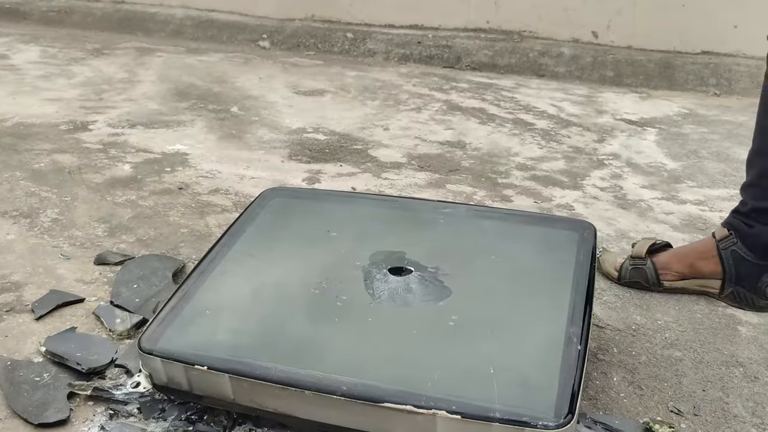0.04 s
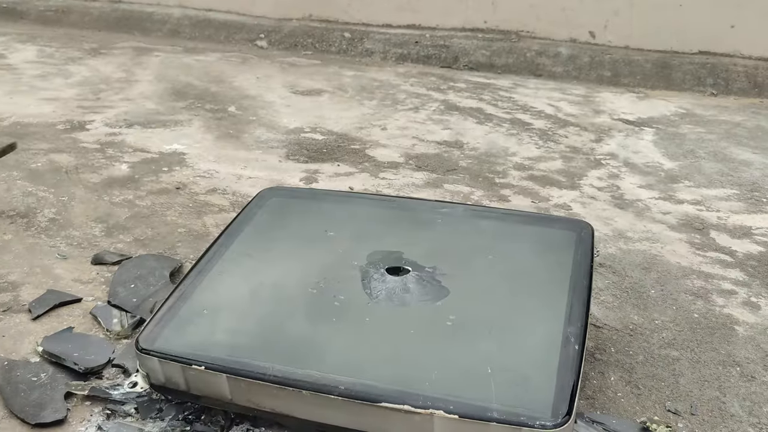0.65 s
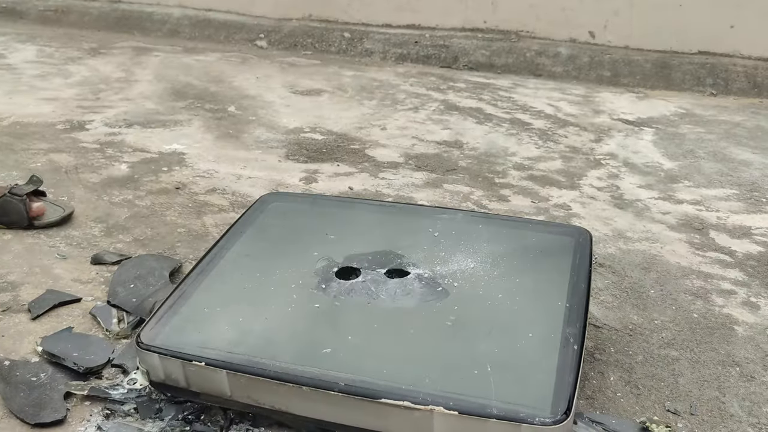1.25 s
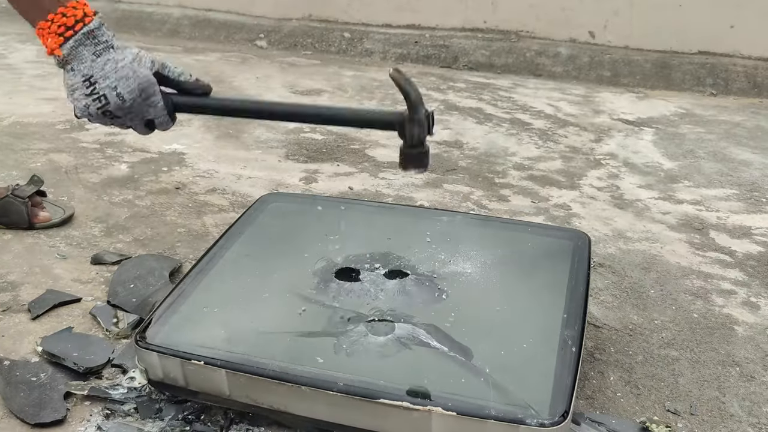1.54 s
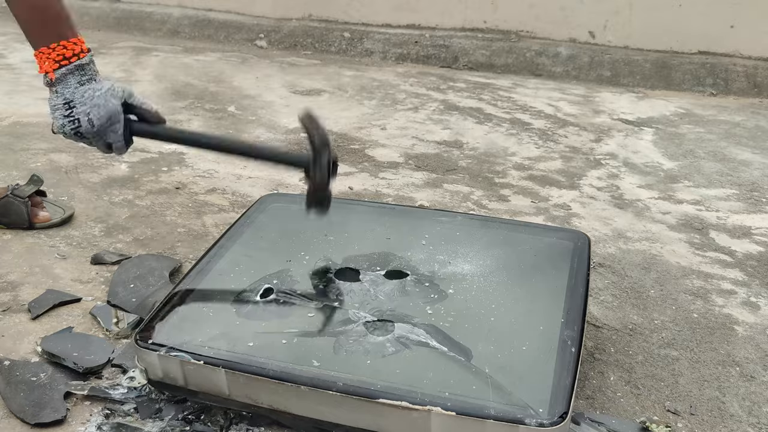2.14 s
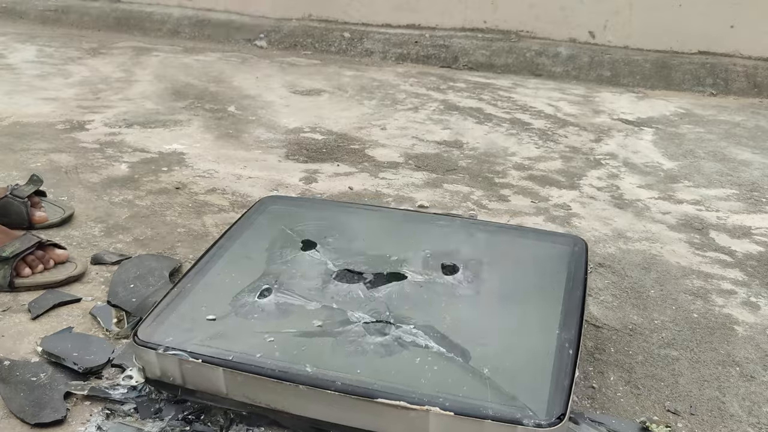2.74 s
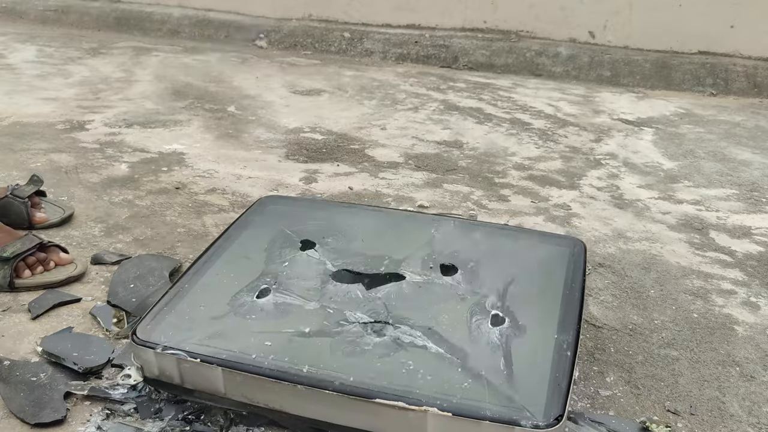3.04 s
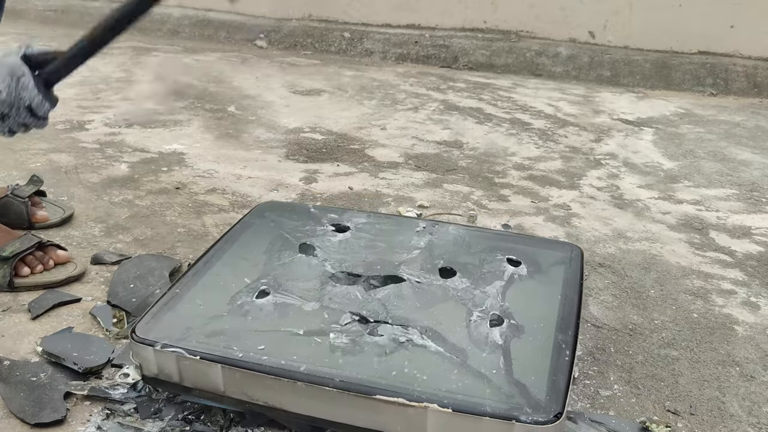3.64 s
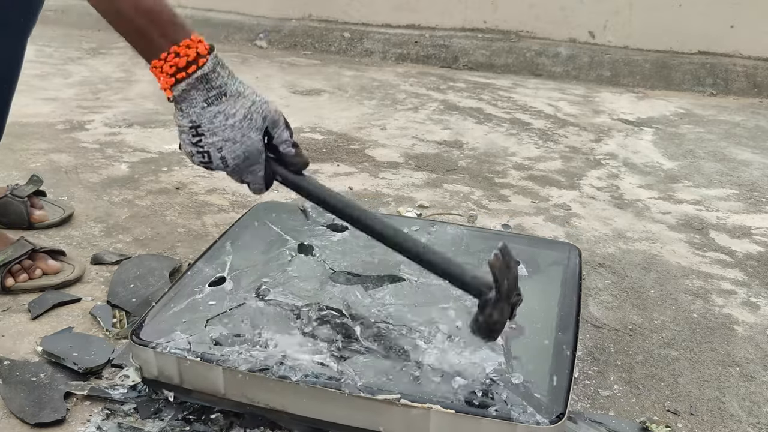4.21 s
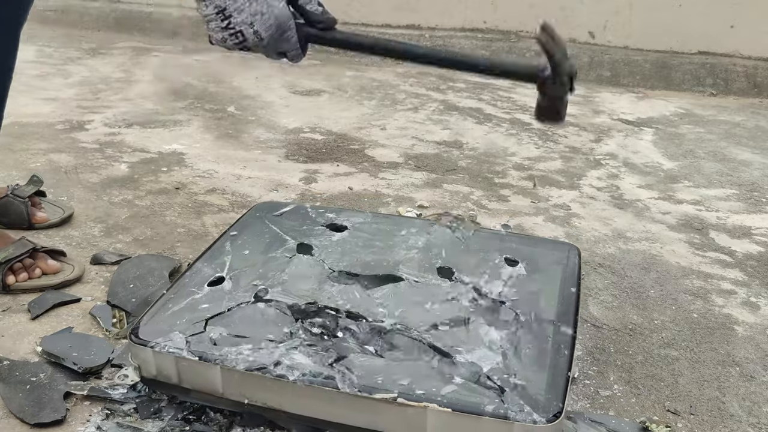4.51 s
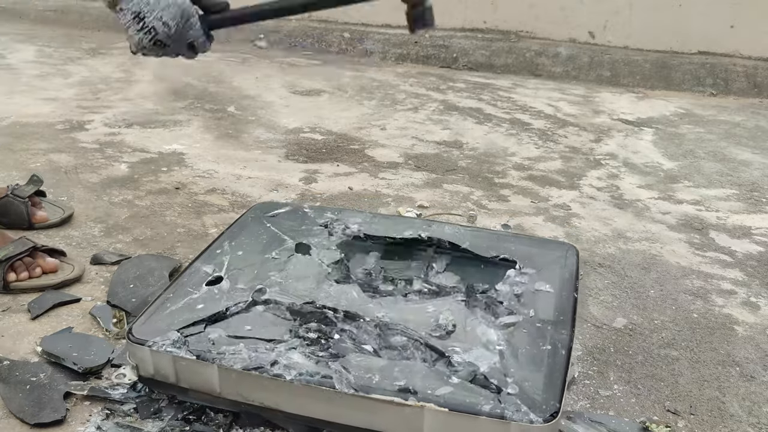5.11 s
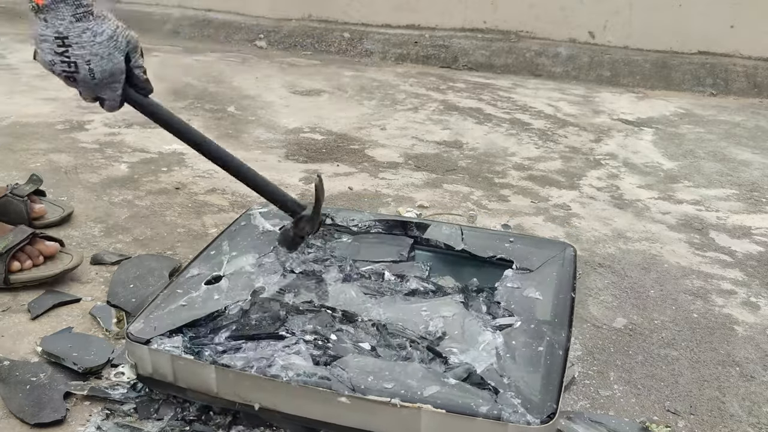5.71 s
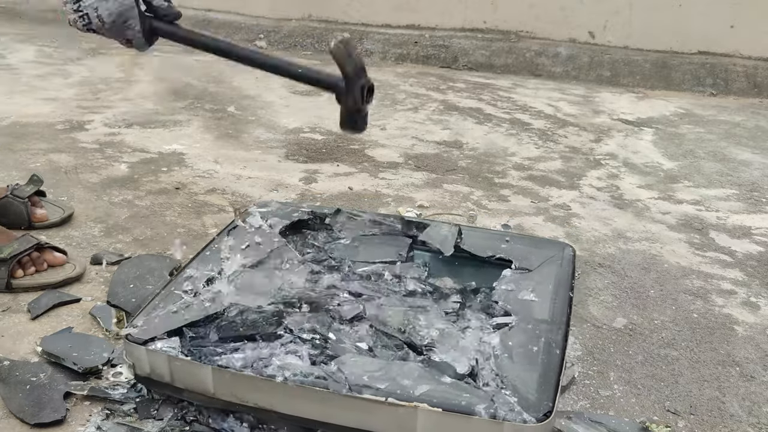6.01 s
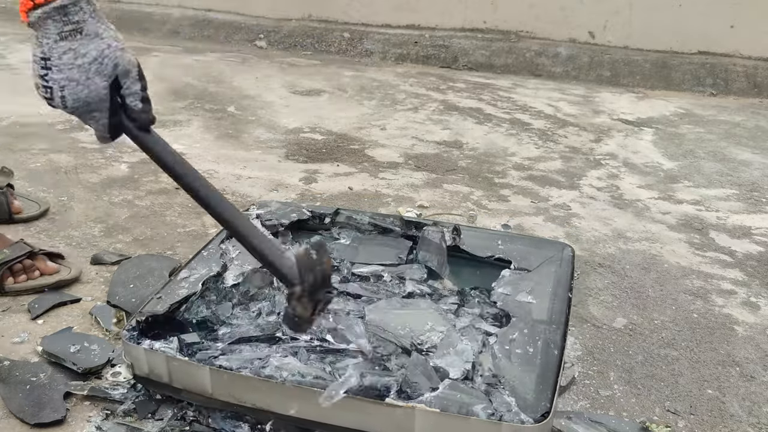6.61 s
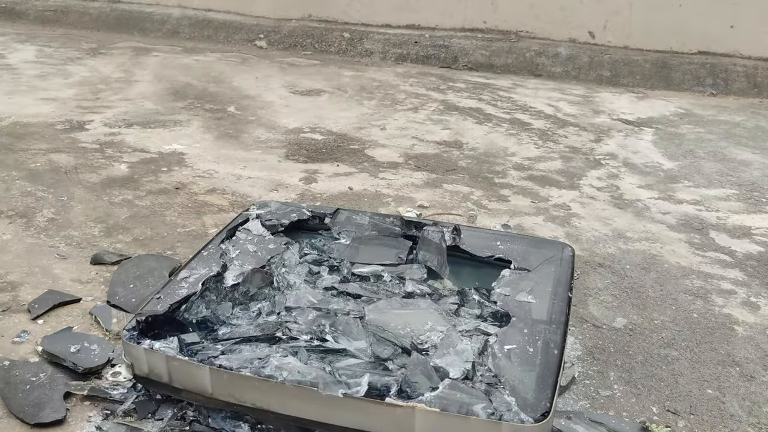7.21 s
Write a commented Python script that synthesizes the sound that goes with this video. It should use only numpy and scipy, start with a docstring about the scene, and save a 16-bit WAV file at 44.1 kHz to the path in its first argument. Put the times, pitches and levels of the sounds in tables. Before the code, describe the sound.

Sandals scuff softly on gritty concrete, then a claw hammer strikes the thick glass of a picture tube about twenty times. Each loud blow cracks, rings briefly and scatters splinters, overloading the close microphone and echoing off yard walls. The hits speed up, loose pieces clink, and the glass caves in with a crunch before one last blow. Faint traffic, small birds and a distant engine lie behind.

```python
"""Far traffic rumbles around a walled yard, sandals scuff on grit and small birds start to call.
From 0.8 s a claw hammer hits the thick glass face of a picture tube lying on concrete, twenty times.
Each blow cracks the glass, rings the face and the steel head, throws splinters and echoes off the walls;
the blows overload the close microphone. From 2.4 s loose pieces drop and clink as the face breaks up.
A distant engine draws near, the face caves in at about 6.2 s, and one last blow follows."""
import sys
import numpy as np
from scipy import signal
from scipy.io import wavfile

SR = 44100
rng = np.random.default_rng(int(sys.argv[2]) if len(sys.argv) > 2 else 0)


def digitize_waveform(pressure):
    """Quantize a signal to 16-bit integers and store it at the path in sys.argv[1].

    Rows of a 2-D input are taken as channels; values are limited to [-1, 1].
    """
    field = np.atleast_2d(pressure).T
    bounded = np.clip(field, -1, 1)
    quanta = np.round(bounded * 32767).astype(np.int16)
    wavfile.write(sys.argv[1], SR, quanta)


N = 328897
TIME = np.arange(N) / SR
EDGES = np.geomspace(22, 17500, 25)   # borders of 24 frequency bands [Hz]
CENTRES = np.sqrt(EDGES[1:] * EDGES[:-1])
BANK = [signal.butter(2, edge, "band", fs=SR, output="sos") for edge in zip(EDGES, EDGES[1:])]


def amp(db):
    """Turn decibels into a gain."""
    return 10 ** (np.asarray(db) / 20)


def dying(t, fade_s):
    """A fade that falls by 60 dB in the fade time."""
    return np.exp(-np.log(1000) * t / fade_s)


def unit(x):
    """Scale a sound to a total energy of 1."""
    return x / np.sqrt(np.sum(x ** 2, axis=-1, keepdims=True) + 1e-20)


def per_band(points):
    """Read a (frequency, value) table at the middle of each band."""
    hz, value = np.transpose(points)
    return np.interp(np.log(CENTRES), np.log(hz), value)[:, None, None]


def panned(db):
    """Left and right gains, with the left louder by db."""
    return amp([[db / 2], [-db / 2]])


def add(out, s, sound):
    """Mix a short sound in at s seconds."""
    i = max(int(s * SR), 0)
    out[:, i:i + sound.shape[-1]] += sound[..., :max(N - i, 0)]


def noise_bands(size, likeness):
    """Noise shaped (bands, 2, size). Left-right likeness: 1 is the same, 0 unrelated, -1 opposite."""
    white = rng.standard_normal((2, 2, size + 2000))
    bands = unit(np.array([signal.sosfilt(sos, white[k % 2])[:, -size:] for k, sos in enumerate(BANK)]))
    alike = np.clip(per_band(likeness), -.99, .99)
    shared = np.sqrt(1 + alike) * bands[:, :1]
    opposed = np.sqrt(1 - alike) * bands[:, 1:] * [[1], [-1]]
    return (shared + opposed) / np.sqrt(2)


def flicker(t, per_s, depth_db):
    """A gain that moves to a new random value per_s times a second."""
    steps = rng.standard_normal(len(t))
    return amp(depth_db * np.interp(t * per_s, np.arange(len(t)), steps))


def ringing(t, tones, scatter_db):
    """A struck thing's fading tones (pitch, level, fade time); high ones reach the sides out of step."""
    hz, db, fade_s = np.transpose(tones)[:, :, None, None]
    phase = rng.uniform(0, 2 * np.pi, hz.shape)
    phase = phase + rng.normal(0, 1, (len(hz), 2, 1)) * np.minimum(hz / 3500, 1)
    strength = amp(db + scatter_db * rng.normal(0, 1, hz.shape))
    return np.sum(strength * dying(t, fade_s) * np.sin(2 * np.pi * hz * t + phase), axis=0)


# how far traffic and breeze swell: (time [s], relative rumble [dB], relative road noise [dB])
TRAFFIC_SWELL = [(0.0, -45, -49.5), (0.89, -47.5, -50), (1.16, -52, -57), (3.88, -49, -55),
                 (4.9, -47.5, -49), (6.09, -44, -45), (7.1, -52, -52), (7.46, -51, -46)]
# their tone colour: (frequency [Hz], level [dB per Hz])
TRAFFIC_COLOUR = [(25, -9.5), (40, -3), (58, 4.5), (85, -6), (120, -4.5), (170, -6), (240, -14.5),
                  (325, -11), (410, -19.5), (600, -14), (1000, -25), (2000, -30.5), (6000, -41),
                  (15000, -55)]
# how alike they are left and right: (frequency [Hz], likeness)
TRAFFIC_LIKENESS = [(50, 1), (200, 1), (700, 0.46), (2000, 0), (10000, 1)]
def traffic():
    """Low rumble and road noise swell slowly; a faint hiss follows the road."""
    times, rumble_db, road_db = np.transpose(TRAFFIC_SWELL)
    hiss_db = -63 + .51 * (road_db - road_db.mean())
    bands = noise_bands(N, TRAFFIC_LIKENESS) * amp(per_band(TRAFFIC_COLOUR))
    bands *= np.sqrt(CENTRES)[:, None, None]   # higher bands are wider
    part = np.digitize(CENTRES, [230, 1200])   # split into rumble, road and hiss [Hz]
    out = np.zeros((2, N))
    for k, (db, left_db) in enumerate([(rumble_db + 1.5, 5), (road_db - 2, 3.5), (hiss_db, .5)]):
        noise = np.sqrt(N) * unit(bands[part == k].sum(axis=0))
        out += noise * panned(left_db) * amp(np.interp(TIME, times, db))
    return out


# the engine's hum: (pitch [Hz], relative level [dB])
ENGINE_TONES = [(322, 0.5), (565, -6)]
# how it grows louder: (time [s], level [dB])
ENGINE_APPROACH = [(0, -69), (3.8, -63), (4.6, -56), (6.7, -52.5), (7.46, -51.5)]
def engine(blur_hz=22):
    """A far engine draws near, its hum blurred by distance into narrow bands of noise."""
    drone = np.zeros(N)
    for hz, db in ENGINE_TONES:
        band = signal.butter(2, [hz - blur_hz, hz + blur_hz], "band", fs=SR, output="sos")
        drone += amp(db) * unit(signal.sosfilt(band, rng.standard_normal(N)))
    return np.sqrt(N) * drone * amp(np.interp(TIME, *np.transpose(ENGINE_APPROACH))) * panned(3.5)


# how alike nearby sounds are left and right: (frequency [Hz], likeness)
NEAR_LIKENESS = [(300, 0.83), (700, 0.93), (1400, 0.31), (2800, 0.4), (5600, 0.15), (11000, 0)]
# sandal scuffs: (time [s], level [dB], rough half length [s])
SCUFFS = [(0.071, -54, 0.011), (0.12, -46.5, 0.015), (0.292, -52, 0.017), (0.397, -46, 0.0055),
          (0.416, -50, 0.023), (0.662, -48.5, 0.027), (0.73, -55.5, 0.015), (1.069, -42, 0.012)]
# their tone colour: (frequency [Hz], band level [dB])
SCUFF_COLOUR = [(200, -28.5), (900, -15), (2000, -9), (3800, 1.5), (7000, -2.5), (11000, -4.5), (15000, -7)]
def sandals():
    """Soles drag over gritty concrete in short, scratchy swells."""
    swells = sum(amp(db) * np.exp(-.5 * ((TIME - s) / width) ** 2) for s, db, width in SCUFFS)
    size = 2 * SR
    rub = np.sum(amp(per_band(SCUFF_COLOUR)) * noise_bands(size, NEAR_LIKENESS), axis=0)
    grit = unit(rub * flicker(TIME[:size], per_s=600, depth_db=4.5)) * np.sqrt(size)
    return swells * np.pad(grit, ((0, 0), (0, N - size)))


# one bird whistles: (time [s], length [s], start pitch [Hz], end pitch [Hz], relative level [dB])
CHIRPS = [(.575, .11, 2950, 2650, -62), (0.667, 0.17, 2300, 3460, -54), (0.713, 0.065, 2400, 1740, -57),
          (1.66, .17, 2720, 3020, -66), (1.75, .1, 1250, 1347, -61), (6.99, 0.1, 960, 840, -59)]
# a tiny bird repeats one thin note: (time [s])
PEEP_TIMES = [1.206, 1.41, 2.07, 2.505, 2.765, 3.05, 7.2]
def birds():
    """Thin sliding whistles from far off flutter on their way across the yard."""
    out = np.zeros((2, N))
    peeps = [(s, .09, 7280, 7000, -62) for s in PEEP_TIMES]   # same columns as CHIRPS
    for s, length, start_hz, end_hz, db in list(CHIRPS) + peeps:
        t = TIME[:int(length * SR)]
        hz = np.linspace(start_hz, end_hz, len(t)) * flicker(t, per_s=250, depth_db=.05)
        flutter = np.array([flicker(t, per_s=120, depth_db=3.5) for side in range(2)])
        whistle = np.hanning(len(t)) * np.sin(2 * np.pi * np.cumsum(hz) / SR)
        add(out, s, amp(db - 1.5) * flutter * whistle)
    return out


# how fast crushed glass falls quiet: (frequency [Hz], fade time [s])
CRUNCH_FADE = [(150, 0.086), (600, .15), (2000, 0.15), (6000, 0.11), (14000, 0.081)]
def breaking_glass(t, colour_db, crunch_db, crack_s=.004, collapse_s=.0049):
    """Cracks run for a few milliseconds, then the crushed glass crunches."""
    noise = noise_bands(len(t), NEAR_LIKENESS)
    crack = unit(noise * np.exp(-(t / crack_s) ** 3))
    rise = 1 - np.exp(-(t / collapse_s) ** 2)
    crunch = unit(noise * rise * dying(t, per_band(CRUNCH_FADE)) * flicker(t, per_s=710, depth_db=-2))
    return np.sum(amp(colour_db) * unit(crack + amp(crunch_db) * crunch), axis=0)


# hammer blows, with relative levels: (time [s], strength [dB], thud of the casing [dB],
# crunch against crack [dB], struck piece's first pitch [Hz], its second pitch [Hz], its ring [dB],
# steel ring [dB], splinters [dB], air push [dB])
BLOWS = [(0.8021, 9, 3.5, 2.5, 470, 2090, -8, -13, -11.5, -3),
         (1.4576, 4.5, 3.5, -3, 1190, 2027, -10.5, -10, -11.5, -12),
         (1.85, 5, -2, -2.5, 585, 1970, -11.5, -17.5, -11, -22.5),
         (2.1826, 4.5, -2.5, -2.5, 640, 1640, -11, -13, -28.5, -8.5),
         (2.5615, 7, -6, -4, 1390, 2910, -11.5, -18.5, -13.5, -8),
         (2.8984, 7.5, -7.5, -4.5, 956, 2070, -8.5, -16.5, -34, -2),
         (3.2138, 6.5, -11.5, -2.5, 684, 6450, -9, -16, -9, -12),
         (3.4546, 8, -3, -5.5, 1190, 1550, -4.5, -10, -19.5, -12.5),
         (3.6919, 4.5, 7.5, -2, 1150, 1910, -9, -22, -37, -3),
         (3.9288, 3.5, 2, -4, 703, 3800, -19, -11, -5.5, -17.5),
         (4.1814, 5, 0.5, 0, 1050, 3080, -20, -19.5, -11.5, 3.5),
         (4.4146, 3.5, -2.5, 0, 1910, 3270, -7, -25.5, -11, -16.5),
         (4.6727, 5, -11.5, 4, 863, 4540, -13.5, -26.5, -2, -21),
         (4.9281, 2, -23, 1, 917, 6100, -14, -28.5, -2, -16.5),
         (5.1776, 5.5, 0, -1.5, 700, 1360, -14.5, -12.5, -5.5, -10.5),
         (5.4188, 3.5, 0, 0.5, 1100, 3620, -15, -14.5, -7, -26),
         (5.6655, 4, 7.5, -3, 1023, 640, -17, -20.5, -11.5, -29),
         (5.9239, 5.5, 10, 1.5, 1033, 1410, -13.5, -24, -3, -6.5),
         (6.1794, 9.5, -1, 12, 1150, 9350, -32, -13, -0.5, -12.5),
         (6.5387, 6.5, 11.5, 3, 6260, 4480, -9, -6, -7.5, -9)]
# tone colour of cracking glass: (frequency [Hz], band level [dB])
CRACK_COLOUR = [(90, -17), (180, -19.5), (330, -14.5), (450, -11), (620, -4.5), (900, -6), (1300, -1),
                (2200, 0), (4000, 0.5), (7000, 0), (11000, 0), (15000, -1)]
# the glass gives way, is firm again at the far rim, then caves in: (time [s], firmness [dB])
FIRMNESS = [(.8, 3), (2.2, 10), (2.55, -2), (3.9, 2.5), (4.67, -4), (5.18, 4.5), (5.7, 3), (6.18, -13.5),
            (6.54, -8)]
# firm glass sounds full, loose glass thin: (frequency [Hz], boost [dB per dB of firmness])
FIRM_COLOUR = [(270, 0.37), (650, 0.97), (1600, 0.51), (4200, 0.32), (10500, 0.1)]
# the casing thuds only in the low notes: (frequency [Hz], share of the thud [0 to 1])
THUD_RANGE = [(270, 1), (650, 0)]
# tones of the glass face: (pitch [Hz], relative level [dB], fade time [s])
FACE_TONES = [(454, -17.5, 0.27), (526, -7, 0.26), (575, 4.5, 0.1), (661, -1.5, 0.16), (860, -9.5, 0.034),
              (1001, -3.5, 0.2), (1127, 7, 0.088), (1224, -7.5, 0.29), (1546, -5, 0.12), (1750, -4, 0.035),
              (2044, -3.5, 0.085)]
def hammer_blows():
    """Each blow breaks glass and rings the whole face; the firmer the glass is held, the fuller."""
    out, t = np.zeros((2, N)), TIME[:SR // 4]
    for s, db, thud_db, crunch_db, *_ in BLOWS:
        firm_db = np.interp(s, *np.transpose(FIRMNESS))
        colour_db = db + per_band(CRACK_COLOUR) + firm_db * per_band(FIRM_COLOUR)
        colour_db += thud_db * per_band(THUD_RANGE)
        add(out, s - .0003, breaking_glass(t[:SR // 6], colour_db, crunch_db) * panned(2))
        add(out, s, amp(db + firm_db - 36) * ringing(t, FACE_TONES, scatter_db=2.5))
    return out


def struck_pieces(first_fade_cycles=41.3, second_fade_s=.012):
    """The piece of glass under the hammer knocks at two pitches that die quickly."""
    out, t = np.zeros((2, N)), TIME[:SR // 8]
    for s, _, _, _, first_hz, second_hz, db, *_ in BLOWS:
        tones = [(first_hz, db, first_fade_cycles / first_hz), (second_hz, db + 3.5, second_fade_s)]
        add(out, s, ringing(t, tones, scatter_db=3))
    return out


# tones of the steel head: (pitch [Hz], relative level [dB], fade time [s])
STEEL_TONES = [(9320, -24, .22), (10430, -18.5, .42), (15635, -22, .22)]
def steel_head():
    """The head sings on as it swings away, wavering in level and pitch with the motion."""
    out, t = np.zeros((2, N)), TIME[:SR // 2]
    for s, *_, steel_db, _, _ in BLOWS:
        swing = np.array([flicker(t, per_s=100, depth_db=6) for side in range(2)])
        wavering_time = np.cumsum(flicker(t, per_s=40, depth_db=.012)) / SR
        add(out, s, amp(steel_db) * swing * ringing(wavering_time, STEEL_TONES, scatter_db=1.2))
    return out


def air_push(rise_s=.0059, fall_s=.019, recover_hz=4.3):
    """The jolt of a blow shoves the microphone membranes, mostly the left, and they creep back."""
    out, t = np.zeros((2, N)), TIME[:SR // 6]
    leak = signal.butter(1, recover_hz, "high", fs=SR, output="sos")
    for s, *_, push_db in BLOWS:
        shove = (1 - np.exp(-t * amp(push_db) / rise_s)) * np.exp(-t / fall_s)   # harder is steeper
        shove = signal.sosfilt(np.vstack([leak, leak]), shove) * (1 - (t / t[-1]) ** 2)
        sides = np.array([[1], [rng.uniform(.05, .7)]]) * rng.choice([-1, 1])
        add(out, s, amp(push_db) * sides * shove / shove.max())
    return out


# tone colour of falling glass: (frequency [Hz], band level [dB])
SHARD_COLOUR = [(150, -40.5), (500, -10.5), (1000, -1.5), (2500, -0.5), (6000, 2.5), (10000, 2),
                (15000, -1)]
def splinters(chips_per_blow=75):
    """Chips thrown by each blow land soon after it: glassy ticks over a rustle of fine crumbs."""
    out, t, after = np.zeros((2, N)), TIME[:SR // 50], TIME[:SR // 3]
    for s, *_, splinter_db, _ in BLOWS:
        flights_s = rng.gamma(2, .048, chips_per_blow)
        sizes = rng.normal(0, 1, chips_per_blow)
        sides_db = rng.normal(0, 2.6, chips_per_blow)
        for flight_s, size, left_db in zip(flights_s, sizes, sides_db):
            ring = ringing(t, [(hz, 0, .02) for hz in rng.uniform(1200, 15500, 5)], scatter_db=2.5)
            click = amp(6.5) * rng.standard_normal((2, len(t))) * dying(t, .005)
            db = splinter_db - 37 + 5.6 * min(size, 1.6) - 37 * flight_s   # late chips land softer
            add(out, s + flight_s, amp(db) * panned(left_db) * (ring + click))
        grit = flicker(after, per_s=450, depth_db=5)
        rustle = np.sum(amp(per_band(SHARD_COLOUR)) * noise_bands(len(after), NEAR_LIKENESS), axis=0)
        swell = (1 - np.exp(-after / .046)) * dying(after, .58)
        add(out, s, amp(splinter_db + 16.5) * unit(rustle * grit) * swell)
    return out


# loose pieces that drop or shift: (time [s], relative level [dB], brightness [dB per octave])
SHARDS = [(2.408, -40, -1.5), (3.356, -30.5, 3.5), (3.643, -34, 1.5), (4.037, -25, -8), (4.069, -28, -1.5),
          (4.342, -31.5, 0.5), (4.597, -23, -0.5), (4.814, -21.5, -0.5), (4.851, -28, 1), (5.124, -24, -1),
          (5.374, -24, 0.5), (5.539, -22.5, 0.5), (5.838, -33, 8), (5.977, -14, 4.5), (6.123, -26, 4),
          (6.32, -16.5, 1), (6.342, -26, -1.5), (6.832, -35.5, 7)]
def shards():
    """Larger pieces clack against the wreck, clink and rattle briefly."""
    out, t = np.zeros((2, N)), TIME[:SR // 16]
    for s, db, bright_db in SHARDS:
        colour_db = per_band(SHARD_COLOUR) + bright_db * np.log2(CENTRES / 3000)[:, None, None]
        rattle = (dying(t, .018) + amp(-7) * dying(t, .12)) * flicker(t, per_s=900, depth_db=3)
        clack = unit(np.sum(amp(colour_db) * unit(noise_bands(len(t), NEAR_LIKENESS) * rattle), axis=0))
        clink = ringing(t, [(hz, 0, .025) for hz in 800 * 16 ** rng.random(8)], scatter_db=2)
        add(out, s, amp(db + 18) * clack + amp(db - 18) * clink)
    return out


# slivers that ring as they land: (time [s], pitch [Hz], level [dB])
TINKLES = [(2.72, 9750, -35), (5.19, 14300, -30), (6.164, 9800, -30), (6.2, 15100, -40), (6.235, 9220, -43),
           (6.321, 9400, -41), (6.381, 9300, -36)]
def tinkles():
    """Each free sliver rings at one high pitch, fluttering as it tumbles."""
    out, t = np.zeros((2, N)), TIME[:SR // 8]
    for s, hz, db in TINKLES:
        tumble = flicker(t, per_s=220, depth_db=4)
        add(out, s, amp(db) * tumble * ringing(t, [(hz, 0, .09)], scatter_db=0))
    return out


# tone colour of the yard's echo: (frequency [Hz], level [dB])
ECHO_COLOUR = [(150, -6), (600, -15), (1500, -13.5), (4000, -12), (8000, -12.5), (15000, -15)]
# how long it lasts: (frequency [Hz], fade time [s])
ECHO_FADE = [(150, 0.52), (600, 0.29), (2000, 0.35), (6000, 0.31), (14000, 0.5)]
# how alike it is left and right: (frequency [Hz], likeness)
ECHO_LIKENESS = [(300, 0.094), (700, 1), (1400, -1.2), (2800, 0.91), (5600, 0.48), (11000, 0.62)]
def yard_echo(sound, wall_s=.085, wall_db=-2, spread_s=.031):
    """Echoes build up and die away, and a second wave returns from the far walls."""
    out, t = np.zeros((2, N)), TIME[:SR * 2 // 5]
    build_up = 1 - np.exp(-(t / .006) ** 2)
    far_walls = amp(wall_db) * np.exp(-((t - wall_s) / spread_s) ** 2)
    fade = (build_up + far_walls) * dying(t, per_band(ECHO_FADE))
    colour = np.sqrt(np.diff(EDGES) * 2 / SR)[:, None, None] * amp(per_band(ECHO_COLOUR))
    starts = [0] + [int((s - .01) * SR) for s, *_ in BLOWS[1:]]
    for start, end in zip(starts, starts[1:] + [N]):   # each blow lands elsewhere and echoes anew
        echo = np.sum(unit(noise_bands(len(t), ECHO_LIKENESS) * fade) * colour, axis=0)
        add(out, start / SR, signal.fftconvolve(sound[:, start:end], echo, axes=1))
    return out


def scene():
    """The work close by, its echoes, and the outdoors around it."""
    near = hammer_blows() + splinters() + shards() + tinkles() + sandals()
    knocks, calls = struck_pieces(), birds()
    echoes = yard_echo(near + amp(-4.5) * knocks + amp(5) * calls)
    return near + knocks + calls + echoes + steel_head() + air_push() + traffic() + engine()


def record(dry, cutoff_hz=15900):
    """The blows overload the microphone, which flattens their peaks; the highest treble is cut off."""
    clipped = dry / (1 + dry ** 6) ** (1 / 6)
    return signal.sosfilt(signal.ellip(10, .1, 70, cutoff_hz, fs=SR, output="sos"), clipped)


dry = scene()
out = record(dry)
digitize_waveform(out)
```